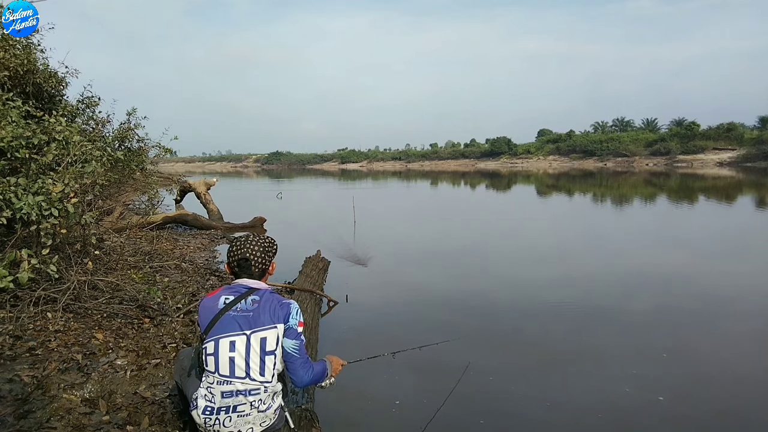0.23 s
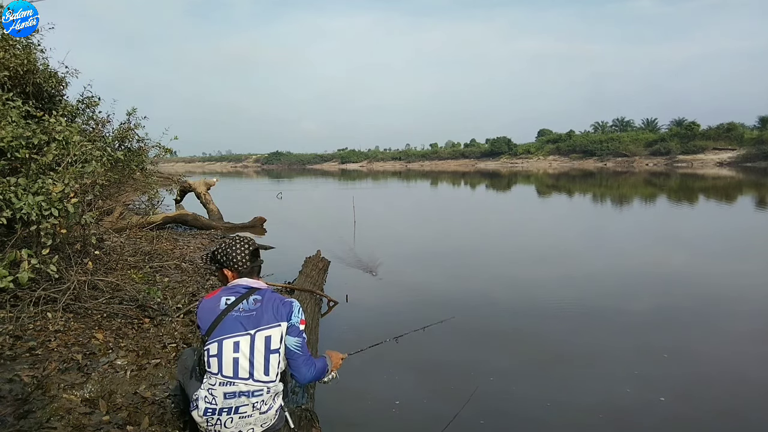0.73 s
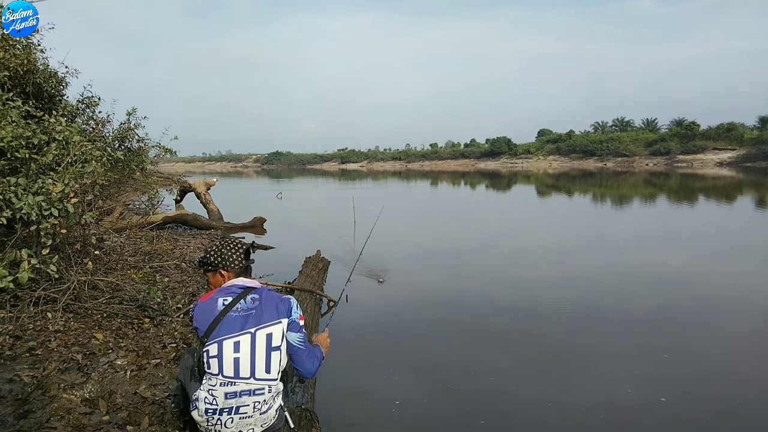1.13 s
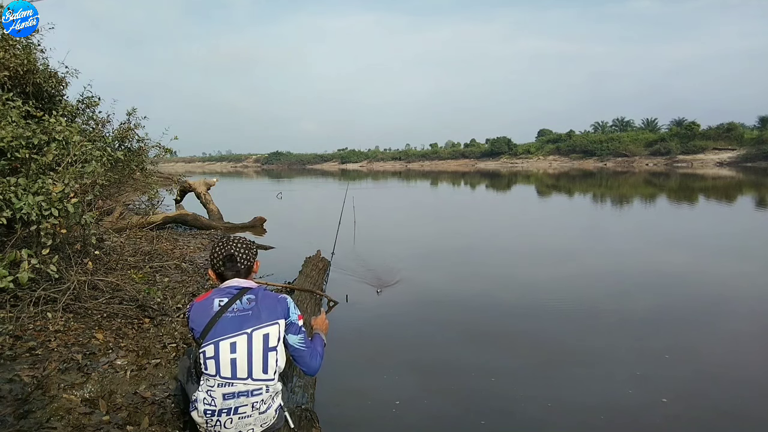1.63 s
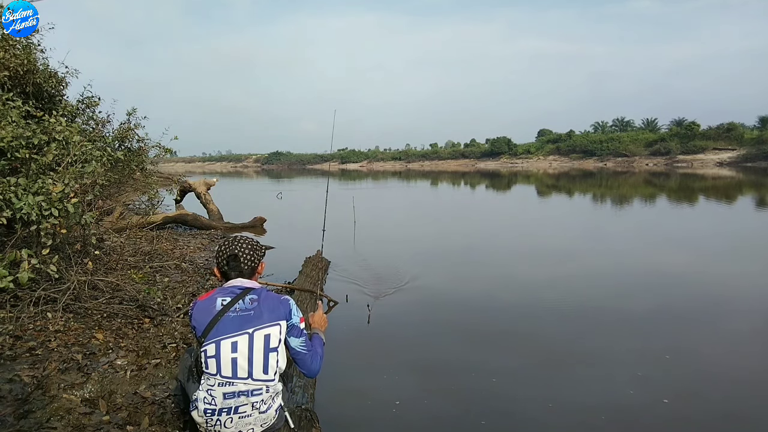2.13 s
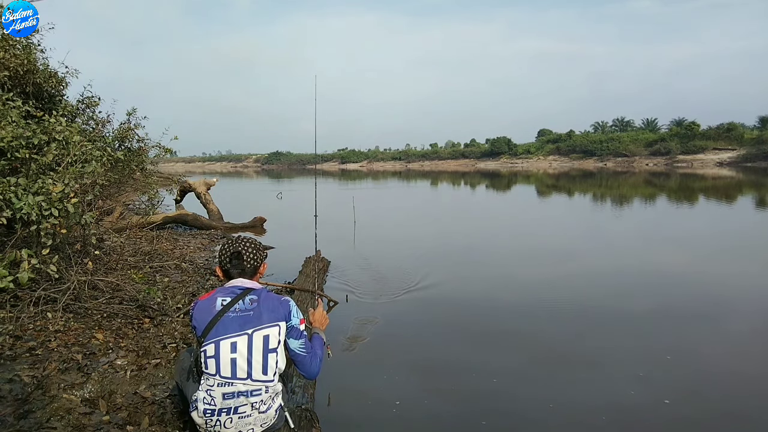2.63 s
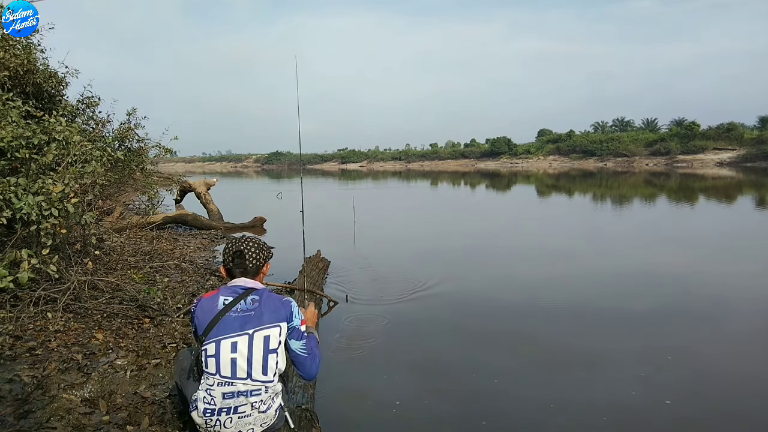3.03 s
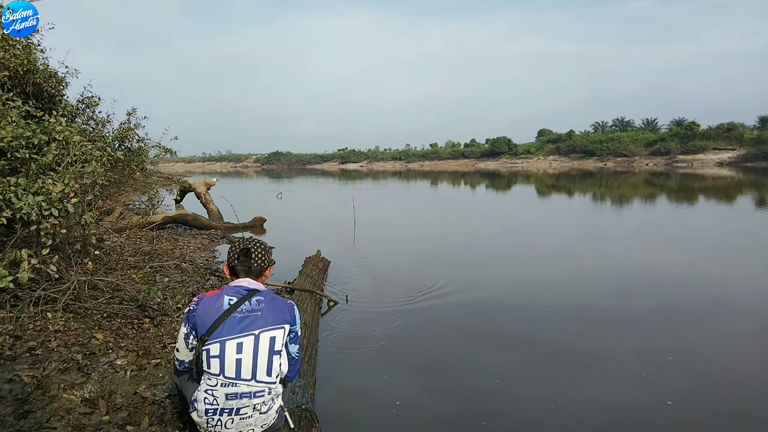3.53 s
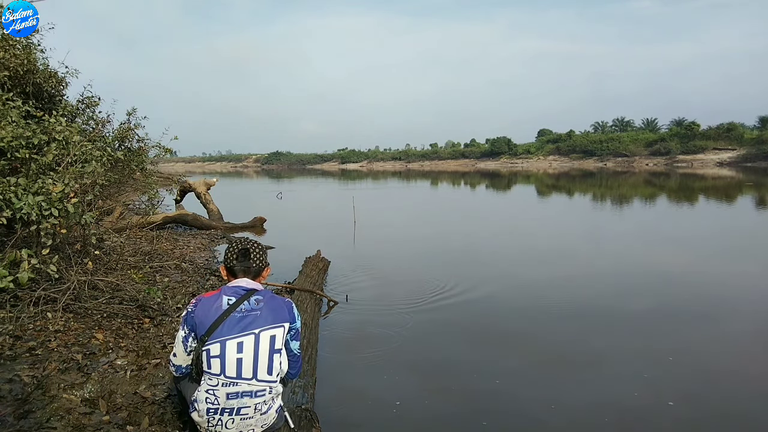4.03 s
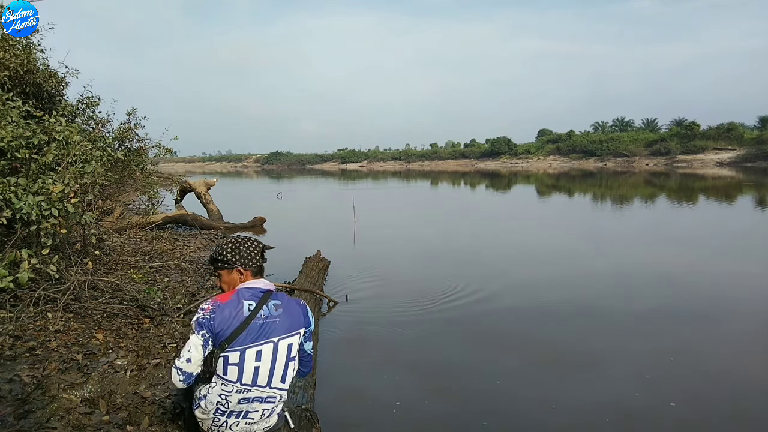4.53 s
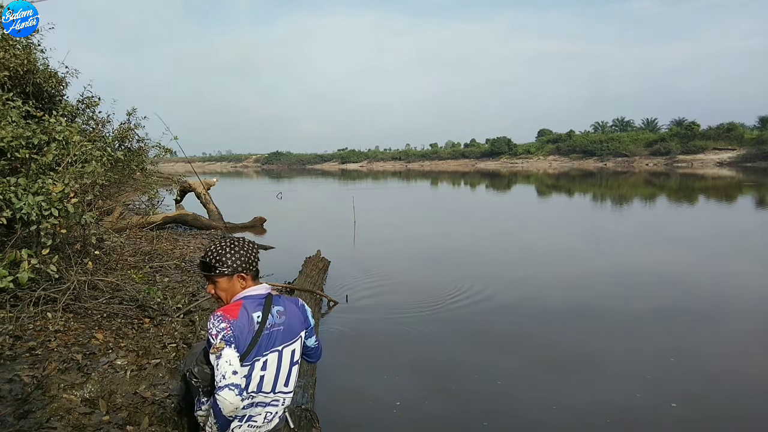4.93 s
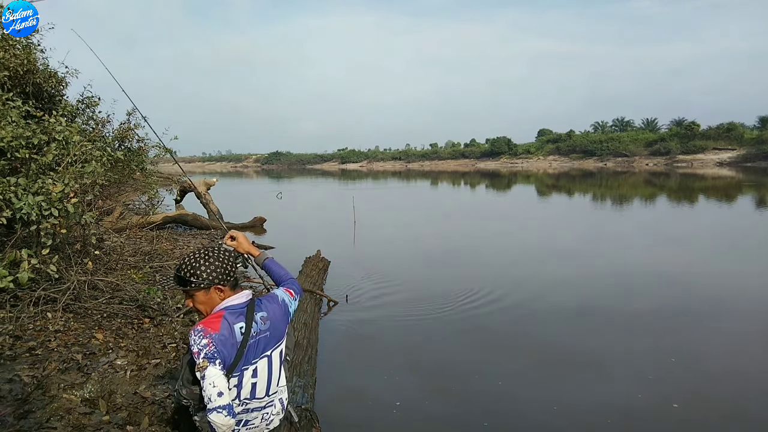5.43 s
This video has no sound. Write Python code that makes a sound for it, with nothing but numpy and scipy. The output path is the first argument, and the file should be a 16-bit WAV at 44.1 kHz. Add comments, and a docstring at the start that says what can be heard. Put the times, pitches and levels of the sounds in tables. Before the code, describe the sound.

A strong throbbing high cicada whine over a calm riverbank, with early water gurgles, snaps, hoots, chirps and short falling bird pips.

```python
"""Riverbank by day

A cicada song throbs in two voices near 8-9 kHz: bursts of rib clicks ringing narrow body modes. Water
gurgles, mostly at first, in gliding bubble tones; a broad hiss fades out within a third of a second.
Near birds hoot, pip and chirp in gliding sines with a short scrub echo; far whistles, cries and faint
blips are rougher sines. Snaps, rustles and dull thuds are impulses, filtered noise and low tones. Wind
brushes the microphone as low noise, and near the end something knocks against it."""
import sys
import numpy as np
from scipy import signal
from scipy.fft import rfft, irfft
from scipy.io import wavfile

SR = 44100
rng = np.random.default_rng(int(sys.argv[2]) if len(sys.argv) > 2 else 0)


def master_out(mix):
    """Clip the mix to full scale and print it as 16-bit PCM to the path in sys.argv[1]."""
    frames = np.transpose(np.atleast_2d(mix))
    ceiling = np.clip(frames, -1, 1)
    pcm = np.round(ceiling * 32767).astype(np.int16)
    wavfile.write(sys.argv[1], SR, pcm)


N = 249998
TIME = np.arange(N) / SR


def amp(db):
    """Decibels to gain."""
    return 10 ** (np.asarray(db) / 20)


def rms_one(x):
    """Scale to unit rms."""
    return x / np.sqrt(np.mean(x ** 2) + 1e-20)


def level(rows, column=1):
    """Gain along a (t/s, level/dB, ..) table, down at -120 dB outside it."""
    table = np.transpose(rows)
    return amp(np.interp(TIME, table[0], table[column], left=-120, right=-120))


def drift(rate_hz):
    """Random wander of rms 1: noise smoothed by a two-pole low-pass."""
    pole = np.exp(-2 * np.pi * rate_hz / SR)
    noise = rng.standard_normal(N + SR)
    settled = signal.lfilter([1], [1, -2 * pole, pole * pole], noise)[SR:]
    return rms_one(settled)


def steep(x, low_hz, high_hz, order=4):
    """Band-pass with steep skirts."""
    return signal.sosfilt(signal.butter(order, [low_hz, high_hz], "band", fs=SR, output="sos"), x)


def band(low_hz, high_hz):
    """Band of noise, rms 1."""
    return rms_one(steep(rng.standard_normal(N), low_hz, high_hz))


def coloured(spectrum):
    """Noise shaped by an (f/Hz, level/dB) curve on a log frequency axis, rms 1."""
    hz, db = np.transpose(spectrum)
    grid_hz = np.maximum(np.arange(N // 2 + 1) * SR / N, 1)
    curve = amp(np.interp(np.log(grid_hz), np.log(hz), db))
    return rms_one(irfft(rfft(rng.standard_normal(N)) * curve, N))


def swell(u, place, fullness):
    """A hump over u = 0..1 with its top at place; small fullness gives a flat top."""
    bent = np.clip(u, 0, 1) ** (np.log(.5) / np.log(np.clip(place, .1, .9)))
    return np.abs(np.sin(np.pi * bent)) ** fullness


def notes(rows, fullness, overhang, rough=0., rough_hz=60):
    """Sines gliding through three pitches; roughness mixes in a noisy tremble, shifted for each note."""
    out = np.zeros(N)
    tremble = drift(rough_hz) + 1j * drift(rough_hz)
    shifts = rng.integers(0, N, len(rows))
    for (s, length, start_hz, middle_hz, end_hz, peak_db, place), shift in zip(rows, shifts):
        # the hump overhangs the note's nominal length at both ends
        first = max(round((s - overhang * length) * SR), 0)
        last = min(round((s + (1 + overhang) * length) * SR), N)
        at = np.arange(first, last)
        u = (at / SR - s) / length
        curve = np.polyfit([0, .5, 1], np.log([start_hz, middle_hz, end_hz]), 2)
        hz = np.exp(np.polyval(curve, u))
        tone = np.exp(2j * np.pi * np.cumsum(hz) / SR)
        tone = tone * (1 - rough + rough * tremble[(at + shift) % N])
        hump = swell((u + overhang) / (1 + 2 * overhang), place, fullness)
        out[at] += amp(peak_db) * hump * tone.imag
    return out


def glides(rows, early, place):
    """Notes from (s, length, start Hz, end Hz, dB); the share early of the glide is done by the middle."""
    return [(s, length, a, a * (b / a) ** early, b, db, place) for s, length, a, b, db in rows]


def scrub_echo(x, t60, length_s):
    """Dense scattered returns from leaves and bank, which die and end soon."""
    return scatter(x, t60, length_s)


def scatter(x, t60, length_s):
    """Smear a sound with a short decaying noise tail of unit energy."""
    t = np.arange(round(length_s * SR)) / SR
    fades = np.clip(t / .012, 0, 1) * np.clip((length_s - t) / .05, 0, 1)
    tail = amp(-60 * t / t60) * fades * rng.standard_normal(len(t))
    return signal.fftconvolve(x, tail / np.sqrt(np.sum(tail ** 2)))[:N]


# colour of the open air: f/Hz, relative level/dB
AIR_COLOUR = [(150, -63), (250, -4), (1180, -6.5), (1350, -8), (3620, -11), (5760, -12), (6280, -11),
              (7730, -4.5), (8420, -10.5), (15400, -11.5)]


def air():
    """Steady open-air hiss: noise shaped to one spectrum."""
    return amp(-53) * coloured(AIR_COLOUR)


# trill bands: f/Hz, width/Hz, level/dB before pulsing and wander
INSECT_BANDS = [(6480, 90, -64), (7500, 70, -69)]


def faint_insects():
    """Far crickets: narrow trills of 35 pulses a second that come and go."""
    trill = (.5 + .5 * np.cos(2 * np.pi * 35 * TIME)) ** 2
    return sum(amp(db + 9.8 * drift(7.9)) * trill * band(hz - width / 2, hz + width / 2)
               for hz, width, db in INSECT_BANDS)


# gust peaks on the microphone: t/s, level/dB before flutter, fading/dB per s
GUST_PEAKS = [(0.0, -40, 50), (0.47, -45.5, 69), (0.78, -47.5, 17.5), (1.36, -43, 111), (1.561, -35, 138),
              (2.79, -56.5, 80), (3.23, -49.5, 76), (3.65, -47.5, 104), (3.94, -47, 202)]
# colour of the steady rumble: f/Hz, relative level/dB
RUMBLE_COLOUR = [(15, -49), (25, -25), (48, 3), (147, 3.5), (182, -1), (221, -48), (244, -5.5), (330, -8.5),
                 (430, -14.5), (730, -120)]
GUST_RISE_DB_PER_S, BREEZE_DB, RUMBLE_DB = 415, -57, -55


def wind():
    """Low noise brushing the microphone: a fluttering breeze, gusts that rise fast and fade, and rumble."""
    gusts = amp(BREEZE_DB)
    for s, db, fading_db in GUST_PEAKS:
        slope_db = np.where(TIME < s, GUST_RISE_DB_PER_S, fading_db)
        gusts = gusts + amp(db - slope_db * np.abs(TIME - s))
    flutter = amp(1.5 * drift(14))
    return gusts * flutter * band(101, 236) + amp(RUMBLE_DB) * coloured(RUMBLE_COLOUR)


def blips(count, level_db):
    """A random scatter of faint rough blips that makes the background patchy."""
    rows = []
    for s, a, b in rng.random((count, 3)):
        hz = 1300 * 3.7 ** b
        # longer blips are louder
        rows.append((s * N / SR, .03 + .06 * a, hz, hz, hz, level_db + 6.0 * a, .4))
    return notes(rows, fullness=0.42, overhang=0.064, rough=0.88, rough_hz=38.7)


# far whistles and single overtones of far cries: t/s, length/s, start f/Hz, end f/Hz, level/dB
FAR_TONES = [(.31, 0.084, 3240, 3190, -47), (.39, 0.24, 4360, 4360, -46), (0.49, 0.093, 2730, 2730, -55),
             (.52, .68, 4580, 4760, -52), (.78, 0.11, 2120, 2170, -44), (.8, 0.21, 3090, 3050, -45),
             (.91, 0.26, 2370, 2380, -49.5), (1.1, 0.28, 1397, 1370, -44), (1.21, 0.085, 2360, 2410, -43),
             (1.38, 0.12, 4680, 4700, -48), (1.44, 0.027, 2935, 2930, -39),
             (2.575, 0.059, 1330, 1410, -39.5), (2.645, 0.073, 1760, 1790, -44.5),
             (2.74, .07, 1400, 1370, -47.5), (3.11, 0.17, 1037, 1017, -42), (3.23, .05, 1880, 1880, -48),
             (3.26, .08, 3330, 3340, -51), (3.36, .12, 3320, 3330, -48), (3.36, 0.075, 988, 960, -51),
             (3.57, 0.025, 4430, 4300, -46), (3.635, 0.024, 4590, 4600, -44),
             (3.64, 0.095, 3020, 3010, -49), (3.64, 0.03, 1960, 1980, -47.5), (3.8, 0.14, 966, 950, -41),
             (3.85, 0.054, 3850, 3820, -46.5), (4.08, 0.081, 1910, 2050, -46), (4.1, 0.17, 980, 948, -43),
             (4.18, 0.058, 2210, 2210, -47.5), (4.23, 0.053, 2650, 2610, -42.5),
             (4.23, 0.1, 3970, 4000, -47), (4.4, 0.19, 3390, 3360, -52), (4.41, 0.14, 978, 970, -42.5),
             (4.47, 0.068, 1880, 1910, -43), (4.47, 0.32, 2064, 2380, -49), (4.66, 0.046, 1990, 1950, -53),
             (4.725, 0.048, 2280, 2340, -47), (4.78, .045, 2230, 1850, -38.5),
             (4.875, 0.039, 2880, 2880, -52), (5.0, 0.097, 993, 1014, -36.5), (5.05, 0.12, 1145, 1130, -40),
             (5.125, 0.075, 1970, 1850, -41.5), (5.25, 0.15, 952, 955, -36.5),
             (5.27, 0.026, 1980, 2000, -42.5), (5.51, .04, 2370, 2400, -41.5)]
# dull far thuds: t/s, length/s, start f/Hz, level/dB
FAR_THUDS = [(2.735, 0.052, 124, -32.5), (2.775, 0.065, 119.6, -28.5)]


def far_tones_and_thuds():
    """Rough gliding sines: whistles, single overtones of cries, and thuds that sag 6 percent in pitch."""
    thuds = [(s, length, hz, 0.94 * hz, db) for s, length, hz, db in FAR_THUDS]
    rows = glides(FAR_TONES + thuds, early=.5, place=0.39)
    return notes(rows, fullness=0.53, overhang=0.045, rough=0.5, rough_hz=34)


# hoarse far cries: t/s, length/s, start, middle and end f/Hz of the fundamental,
# reference level/dB, overtone position where it applies (may lie outside the sounded ones)
FAR_CRIES = [(0.739, 0.59, 660, 691, 634, -42.5, 5.04), (1.828, 0.29, 657, 680, 666, -45.5, 5.3),
             (3.1, 0.16, 650, 665, 662, -48.5, 3.3), (4.657, 0.12, 663, 663, 682, -50, 3.5),
             (5.418, 0.29, 644, 676, 660, -43.5, 7.2)]
CRY_FALL_DB = 3.5   # loss for each overtone step away from the reference position


def cries():
    """Only overtones four to six of each cry carry this far, each trembling on its own."""
    rows = [(s, length, k * a, k * b, k * c, db - CRY_FALL_DB * abs(k - position), .45)
            for s, length, a, b, c, db, position in FAR_CRIES for k in range(4, 7)]
    return notes(rows, fullness=.5, overhang=.04, rough=.9, rough_hz=45)


# cloth and leaves, one list a rustle: t/s, level/dB
RUSTLE_LEVELS = [
    [(0.59, -42), (0.605, -44.5), (0.95, -63)],
    [(2.53, -63), (2.566, -43), (2.68, -66)],
    [(5.5, -50), (5.59, -34.5), (5.669, -46)],
]
# rustle colour: f/Hz, width/Hz, relative level/dB
RUSTLE_COLOUR = [(1930, 320, -1), (2540, 200, 4.5), (3310, 68, -6), (4090, 330, 3.5), (4670, 120, 1),
                 (5160, 280, -3), (5940, 570, -5.5), (3630, 62, -9)]


def rustle():
    """Dense uneven grains through a few bands, each flickering on its own."""
    grains = rng.standard_normal(N) * amp(3.5 * drift(150))
    bands = sum(amp(db + 2.8 * drift(18.6)) * rms_one(steep(grains, hz - width / 2, hz + width / 2, order=2))
                for hz, width, db in RUSTLE_COLOUR)
    return sum(level(rows) for rows in RUSTLE_LEVELS) * rms_one(bands)


# blows on the microphone: t/s, relative level/dB
BLOWS = [(5.519, -11), (5.566, -18), (5.579, -36), (5.593, -20.5)]
# housing modes: f/Hz, relative level/dB, t60/s
HOUSING_MODES = [(131.4, 7, 0.083), (436, -8, 0.091), (927, -14, 0.16)]


def knocks():
    """Soft blows on the housing set its modes ringing, roughened by loose contact."""
    out = np.zeros(N)
    for hz, db, t60 in HOUSING_MODES:
        loose = amp(3.0 * drift(68))
        for s, peak_db in BLOWS:
            t = np.maximum(TIME - s, 0)
            build_up = 1 - np.exp(-t * hz / 1.67)   # takes a cycle or two
            ring = amp(peak_db + db - 60 * t / t60) * np.sin(2 * np.pi * hz * t)
            out += loose * build_up * ring
    return out


# dry clicks: t/s, centre f/Hz, width/Hz, peak level/dB
SNAPS = [(.262, 1480, 750, -21.5), (1.52, 1580, 445, -20), (0.108, 3000, 870, -21.5),
         (.195, 2060, 400, -42), (.603, 2120, 1550, -21.5), (.777, 2200, 500, -33), (.777, 3150, 680, -21),
         (1.443, 4980, 2060, -15), (2.678, 11800, 3500, -14)]


def clicks():
    """Single dry snaps: an impulse through a band of its own."""
    out = np.zeros(N)
    for s, hz, width, peak_db in SNAPS:
        snap = steep(np.r_[1., np.zeros(999)], hz - width / 2, hz + width / 2)
        out[round(s * SR):][:1000] += amp(peak_db) * snap / np.abs(snap).max()
    return out


# splash: t/s, lower band level/dB, upper band level/dB
SPLASH_LEVELS = [(0.0, -41, -50.5), (0.488, -56, -53.5), (0.738, -39, -40), (1.2, -61, -52.5)]


def splash():
    """Water noise in two low bands, each with its own level curve."""
    return level(SPLASH_LEVELS) * band(300, 870) + level(SPLASH_LEVELS, column=2) * band(870, 1450)


# fading hiss: t/s, level/dB before a 9.5 dB lift
HISS_LEVELS = [(0.0, -48), (0.22, -60), (0.3, -77)]


def opening_hiss():
    """Broad hiss that fades out within the first third of a second."""
    return level(HISS_LEVELS) * amp(9.5) * band(1170, 9400)


# bubbles: t/s, length/s, start f/Hz, end f/Hz, level/dB, place of the peak 0-1
BUBBLE_NOTES = [(0.005, 0.032, 356, 1380, -27.5, 0.35), (0.113, 0.023, 683, 1293, -20, 0.36),
                (0.153, 0.049, 314, 1420, -21, 0.47), (0.258, 0.0083, 1130, 1736, -19, 0.48),
                (0.268, 0.044, 417, 641, -25.5, 0.36), (0.305, 0.012, 850, 1170, -23.5, 0.58),
                (0.363, 0.017, 960, 1060, -16, 0.63), (0.485, 0.031, 506, 1410, -20, 0.58),
                (0.555, 0.02, 792, 695, -21.5, 0.84), (0.582, 0.023, 830, 1136, -19.5, 0.38),
                (0.662, 0.019, 840, 746, -20.5, 0.83), (0.675, 0.036, 311, 1333, -16.5, 0.58),
                (0.784, 0.032, 654, 1500, -11, 0.22), (0.872, 0.017, 684, 1196, -21.5, 0.75),
                (0.875, 0.056, 319, 1317, -22, 0.16), (1.03, 0.029, 856, 1505, -22.5, 0.61),
                (1.125, 0.0398, 427, 690, -23, 0.3), (1.24, 0.024, 630, 870, -29.5, 0.28),
                (1.313, 0.011, 1720, 1890, -28, 0.089), (1.522, 0.016, 1453, 1754, -26.5, 0.62),
                (5.03, 0.027, 1376, 1147, -39, 0.41), (5.145, 0.034, 963, 1140, -31.5, 0.54),
                (5.21, 0.013, 1013, 1207, -18.5, 0.52), (5.258, 0.014, 1052, 1060, -30, 0.7),
                (5.277, 0.018, 871, 770, -27, 0.45)]
BIG_BUBBLE_HZ = 500   # below this start the glide is even in log pitch, above it even in Hz


def bubbles():
    """Each bubble is a gliding tone, most of them rising; big ones climb slowly at first."""
    rows = []
    for s, length, a, b, db, place in BUBBLE_NOTES:
        middle_hz = np.sqrt(a * b) if a < BIG_BUBBLE_HZ else (a + b) / 2
        rows.append((s, length, a, middle_hz, b, db, place))
    return notes(rows, fullness=0.62, overhang=0.071, rough=0.24, rough_hz=127)


# hoots: t/s, length/s, centre f/Hz, level/dB
HOOT_NOTES = [(0.365, 0.027, 364, -23), (0.474, 0.045, 412.5, -18.5), (0.566, 0.022, 423, -16.5),
              (0.593, 0.025, 432, -17), (0.787, 0.017, 399, -20.5), (1.016, 0.044, 411.4, -19.5),
              (1.43, 0.04, 406.4, -21), (4.214, 0.014, 454, -39.5)]
HOOT_RISE_HZ_PER_S = 1090


def hoots():
    """Low pure tones whose pitch creeps up."""
    rows = []
    for s, length, hz, db in HOOT_NOTES:
        half_rise = HOOT_RISE_HZ_PER_S * length / 2
        rows.append((s, length, hz - half_rise, hz + half_rise, db))
    return notes(glides(rows, early=0.59, place=0.72), fullness=0.38, overhang=0.115)


# calls of the pip bird: t/s, level/dB, number of pips
PIP_CALLS = [(2.708, -18.5, 3), (3.623, -19, 4), (4.652, -18.6, 4)]
# one pip call: t/s into the call, length/s, relative level/dB
PIP_PATTERN = [(0.002, 0.025, 0.2), (0.069, 0.0278, -1), (0.147, 0.0211, -2), (0.246, 0.017, -9.5)]
PIP_HZ = 978.5, 877, 779   # start, middle, end


def pips():
    """Short runs of pure falling pips in one rhythm."""
    rows = [(s + lag, length, *PIP_HZ, db + loss_db, 0.49)
            for s, db, count in PIP_CALLS for lag, length, loss_db in PIP_PATTERN[:round(count)]]
    return notes(rows, fullness=1.0, overhang=0.099)


# falling chirps: t/s, length/s, start f/Hz, end f/Hz, level/dB
CHIRP_NOTES = [(0.015, 0.041, 4410, 3050, -38.5), (0.155, 0.065, 3810, 3220, -39.5),
               (0.415, 0.055, 4300, 3480, -38.5), (0.7, 0.02, 3940, 3470, -30.5),
               (0.955, 0.059, 4040, 3410, -45), (1.53, 0.038, 4800, 4300, -45.5),
               (1.836, 0.017, 4010, 3540, -37.5), (1.965, 0.0137, 3820, 3200, -39),
               (3.965, 0.015, 4320, 3730, -40)]
# warble phrase: t/s into it, length/s, start, middle and end f/Hz before the pitch factor,
# relative level/dB, place of the peak 0-1
WARBLE_PHRASE = [(0, 0.017, 4330, 4280, 4220, -15, 0.54), (0.102, 0.0154, 2930, 2930, 2600, -14.5, 0.1),
                 (0.127, 0.0232, 3510, 3740, 3840, -1.5, 0.66), (0.156, 0.0134, 2680, 3310, 4000, -4, 0.74),
                 (0.175, 0.023, 4010, 3344, 2780, -0.2, 0.47), (0.241, 0.018, 2550, 2930, 2450, -5.5, 0.36),
                 (0.263, 0.027, 2693, 2946, 2465, -1.5, 0.65)]
# warbles sung: t/s, level/dB, pitch factor
WARBLE_CALLS = [(1.9, -27, 0.995), (3.939, -30.5, 1.01)]
# hooked phrase: t/beats into it, length/beats, start, middle and end f/Hz,
# relative level/dB, place of the peak 0-1
HOOK_PHRASE = [(0, 0.88, 1857, 1923, 2026, -0.46, 0.73), (0.718, 1.4, 2057, 1510, 1316, -1, 0.18)]
# hooked calls sung: t/s, level/dB, beat/s
HOOK_CALLS = [(3.124, -26, .019), (3.355, -23, .03)]


def chirps():
    """Slightly rough gliding sines: falling chirps, the warble and the hooked call."""
    falling = glides(CHIRP_NOTES, early=.8, place=0.39)
    warble = [(s + lag, length, a * factor, b * factor, c * factor, db + loss_db, place)
              for s, db, factor in WARBLE_CALLS for lag, length, a, b, c, loss_db, place in WARBLE_PHRASE]
    hooks = [(s + lag * beat, length * beat, a, b, c, db + loss_db, place)
             for s, db, beat in HOOK_CALLS for lag, length, a, b, c, loss_db, place in HOOK_PHRASE]
    return notes(falling + warble + hooks, fullness=0.52, overhang=0.074, rough=0.26, rough_hz=140)


SLACK_REST, SLACK_SHARPNESS = .33, 3.2   # a slack voice drones on between narrower throbs


def cicada(pace, song, body, per_s, jitter, blur, fullness, rest, full_db, place):
    """The tymbal buckles in quick bursts of rib clicks into the body modes; effort tilts their balance."""
    paced, sung = np.transpose(pace)
    times, dbs, slackness = np.transpose(song)
    starts = np.interp(np.arange(sung[-1] + 1), sung, paced)
    levels_db = np.interp(starts, times, dbs)
    slacks = np.interp(starts, times, np.clip(slackness, 0, 1))

    # the song never quite stops between throbs; this floor lags the throb levels by 76 ms
    floor = rest + SLACK_REST * np.interp(TIME, starts, slacks)
    gain = floor * amp(np.interp(TIME, starts + 0.076, levels_db))
    for s, end, level_db, slack in zip(starts, starts[1:], levels_db, slacks):
        span = slice(max(round(s * SR), 0), round(end * SR))
        u = (TIME[span] - s) / (end - s)
        gain[span] += amp(level_db) * swell(u, place, fullness + SLACK_SHARPNESS * slack)

    turns = np.cumsum(per_s * (1 + jitter * drift(9.8))) / SR
    burst = (.5 + .5 * np.cos(2 * np.pi * turns)) ** 7
    # the rib pattern repeats from burst to burst, blurred by chance
    ribs = np.interp(turns % 1, np.linspace(0, 1, 380), rng.standard_normal(380))
    drive = burst * (rms_one(ribs) * (1 - blur) + blur * rng.standard_normal(N))

    effort_db = 20 * np.log10(gain + 1e-9) - full_db
    ringing, power = 0, 0
    for hz, width, db, slope in body:
        mode = rms_one(steep(drive, hz - width / 2, hz + width / 2, order=3))
        ringing = ringing + amp(db + slope * effort_db) * mode
        power = power + amp(2 * (db + slope * effort_db))
    # evened out, so that effort changes the colour and gain alone the loudness
    return gain * ringing / np.sqrt(power)


# throb pace: t/s, throbs sung so far
UPPER_THROBS = [(-0.06, 0), (3.262, 24), (4.03, 30), (5.76, 43)]
# song, read at the start of each throb: t/s, level/dB, slackness 0-1
UPPER_SONG = [(-0.06, -32.5, .01), (0.22, -39, .01), (0.49, -35.5, .01), (1.6, -33.5, 0.27),
              (2.3, -31, 0.13), (2.71, -31, .01), (2.985, -37.5, .01), (3.123, -35, .01), (3.262, -59, .01),
              (3.9, -80, .01), (4.03, -63, .5), (4.16, -46.5, .3), (4.56, -40, .3), (5.1, -44, .01),
              (5.76, -47, .01)]
# body modes: f/Hz, width/Hz, relative level/dB, extra dB for each dB of effort
UPPER_MODES = [(9040, 200, -2, .1), (9230, 190, -2, 0.01)]


def upper_voice():
    """Upper voice of the cicada song, just above 9 kHz; after 4 s it is the low singer's upper edge."""
    return cicada(UPPER_THROBS, UPPER_SONG, UPPER_MODES, per_s=116, jitter=.015, blur=0.35,
                  fullness=.6, rest=0.04, full_db=-40, place=.52)


# throb pace: t/s, throbs sung so far
LOWER_THROBS = [(-0.03, 0), (0.105, 1), (0.219, 2), (0.635, 5), (1.491, 11), (2.063, 15), (2.368, 17),
                (2.527, 18), (2.702, 19), (2.988, 21), (3.11, 22), (3.22, 23), (3.351, 24), (3.62, 26),
                (4.69, 34), (5.77, 42)]
# song, read at the start of each throb: t/s, level/dB, slackness 0-1
LOWER_SONG = [(-0.03, -28.5, 0.3), (0.105, -30.5, .01), (0.219, -25.5, .01), (0.7, -24.5, .01),
              (1.491, -25, 0.12), (2.3, -26, .01), (2.527, -28.5, .01), (2.702, -34.5, 0),
              (2.848, -48, 0.4), (2.988, -66, .3), (3.11, -48, .3), (3.22, -53, 0.4), (3.351, -51.5, .3),
              (3.49, -66, .3), (3.62, -42.5, .5), (3.89, -40.5, 0.9), (4.02, -35, 0.7), (4.55, -32, 0.95),
              (4.69, -26.5, .1), (5.092, -26.5, 0.26), (5.499, -25, 0.04), (5.77, -32, .01)]
# body modes: f/Hz, width/Hz, relative level/dB, extra dB for each dB of effort
LOWER_MODES = [(7950, 70, -15, .3), (8230, 140, -5, 0.01), (8390, 160, -4, .3), (8600, 280, 0, .9),
               (8810, 200, -6, 1.6)]


def lower_voice():
    """Lower voice of the cicada song: the low singer, ringing near 8 to 8.8 kHz."""
    return cicada(LOWER_THROBS, LOWER_SONG, LOWER_MODES, per_s=116, jitter=.012, blur=.25,
                  fullness=1.0, rest=.09, full_db=-27, place=.55)


def scene():
    """All voices, nearly central, with echoes, wind and air."""
    background = air() + faint_insects() + wind()
    far = blips(count=80, level_db=-61) + far_tones_and_thuds() + cries()
    handling = rustle() + knocks()
    near = clicks() + bubbles() + hoots() + pips() + chirps()
    cicadas = steep(upper_voice() + lower_voice(), 7850, 9360, order=6)
    near_echo = amp(-8.5) * scrub_echo(near, t60=0.58, length_s=0.14)
    cicada_echo = amp(-10) * scrub_echo(cicadas, t60=0.15, length_s=0.25)
    mid = background + far + handling + splash() + opening_hiss() + near + cicadas + near_echo + cicada_echo
    # a very faint diffuse difference between the channels
    side = amp(-50) * scatter(mid, t60=.05, length_s=.05)
    return np.array([mid + side, mid - side])


def record(dry):
    """The microphone loses the deepest bass; the top is cut."""
    thin = signal.sosfilt(signal.butter(2, 42, "high", fs=SR, output="sos"), dry)
    return signal.sosfilt(signal.ellip(14, .5, 95, 15680, fs=SR, output="sos"), thin)


dry = scene()
out = record(dry)
master_out(out)
```